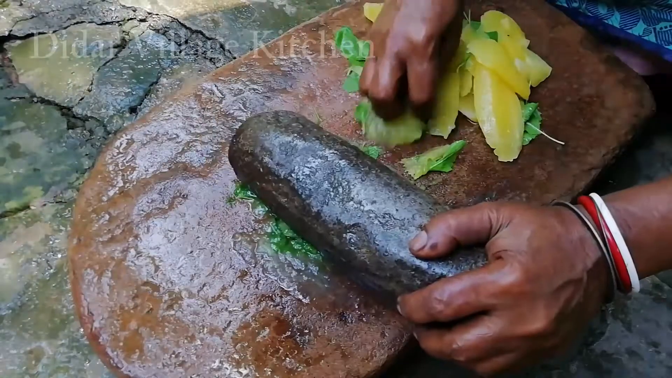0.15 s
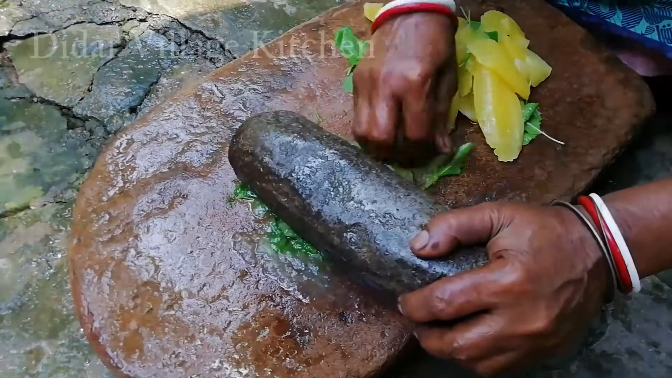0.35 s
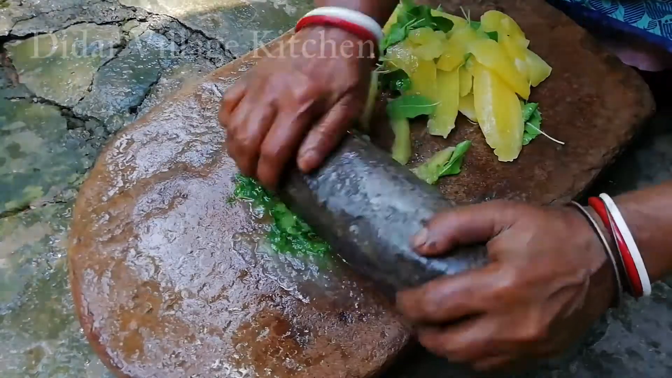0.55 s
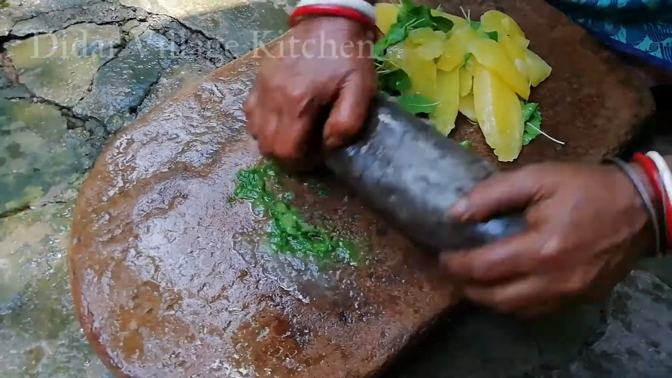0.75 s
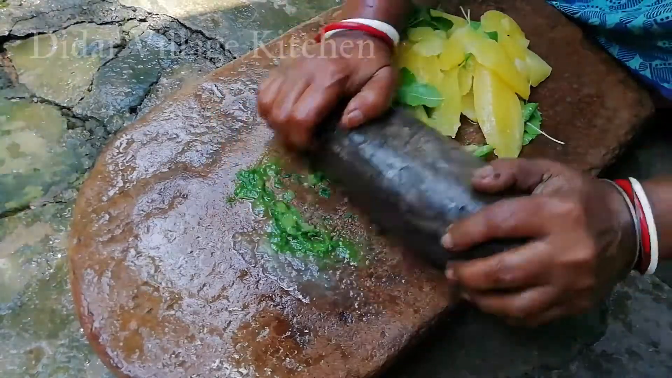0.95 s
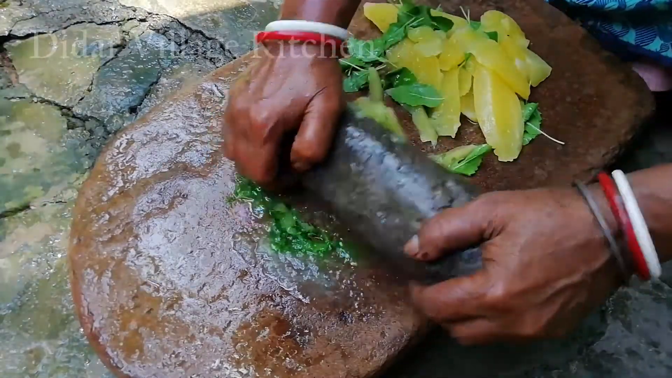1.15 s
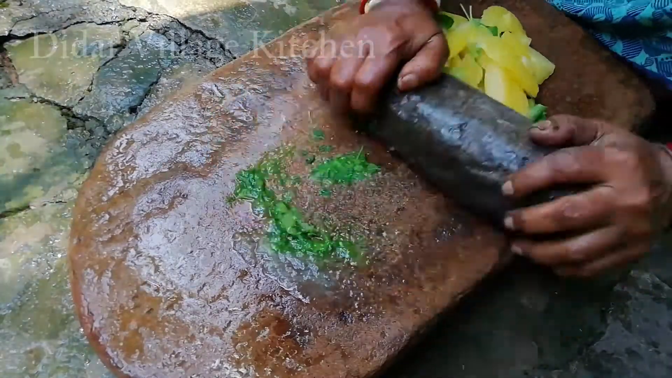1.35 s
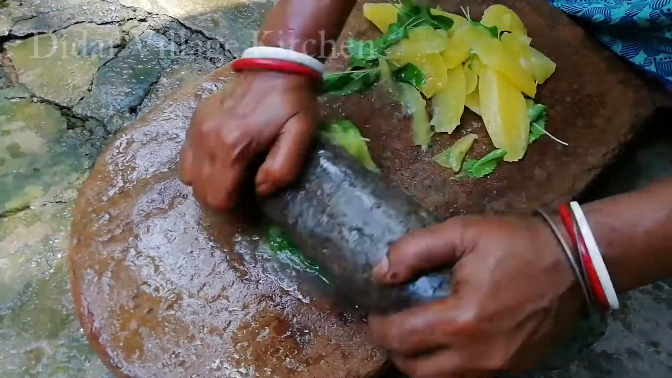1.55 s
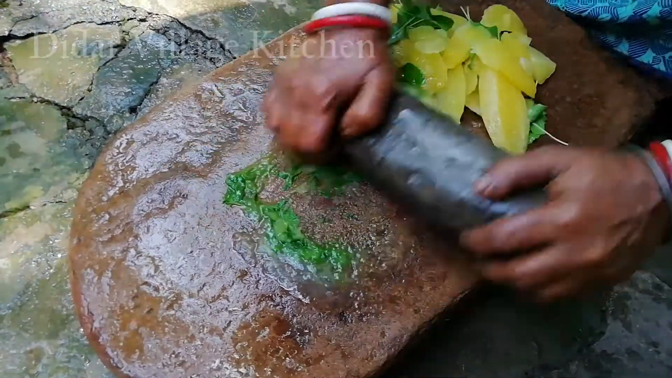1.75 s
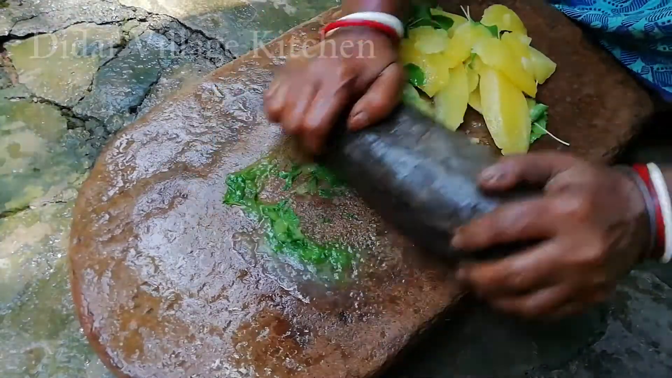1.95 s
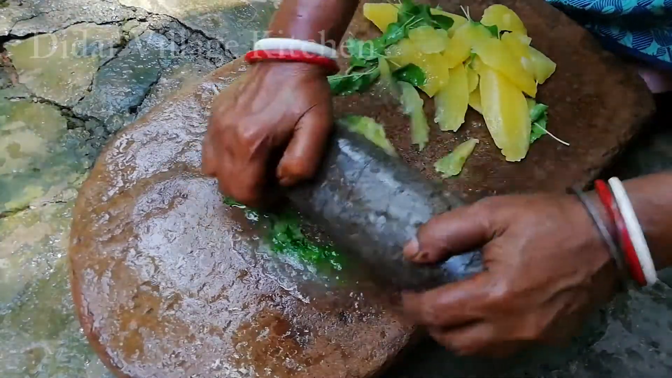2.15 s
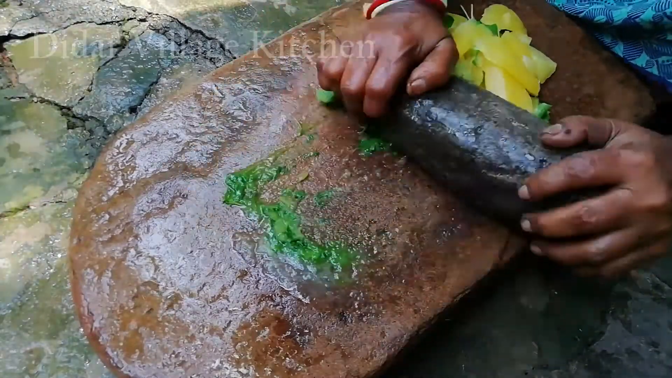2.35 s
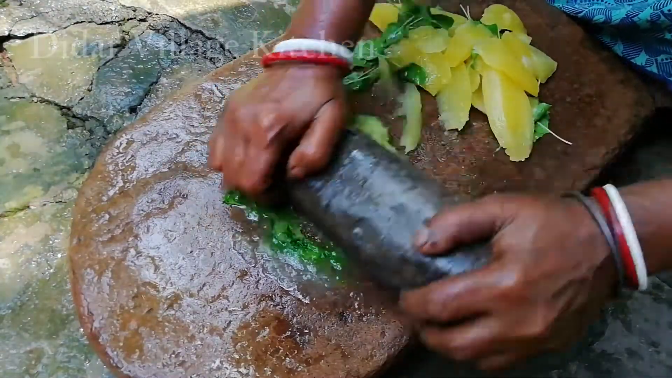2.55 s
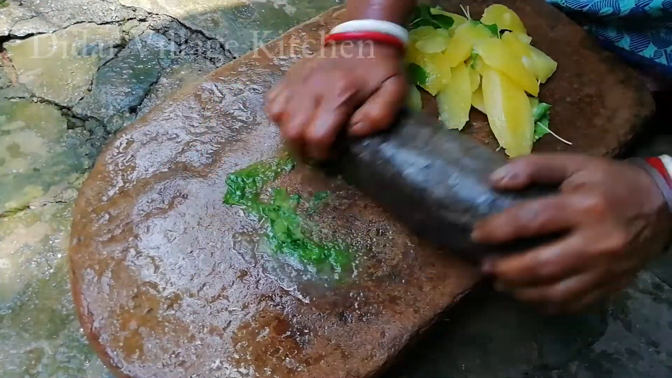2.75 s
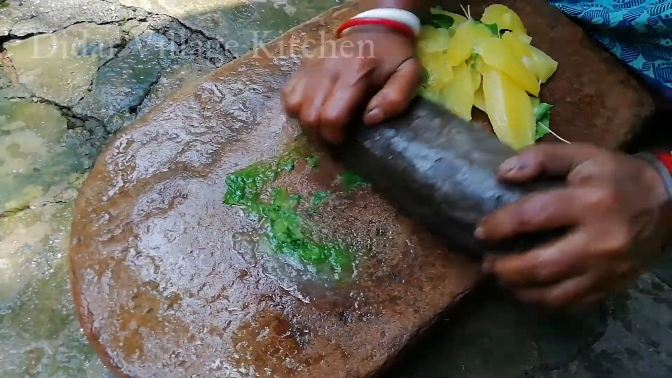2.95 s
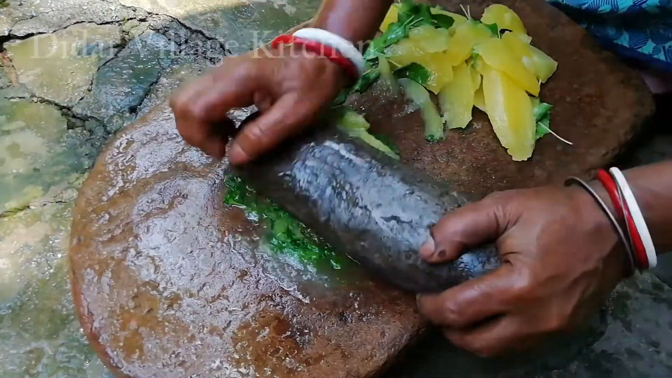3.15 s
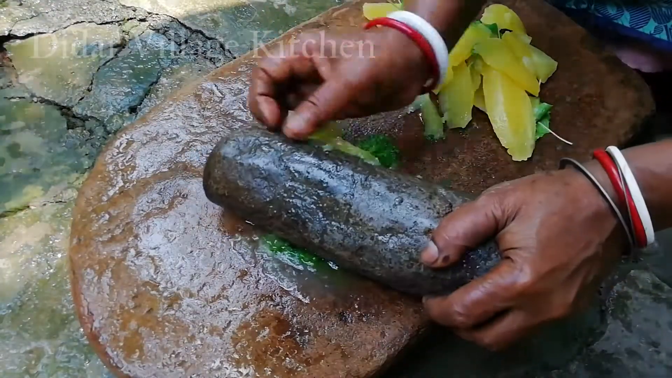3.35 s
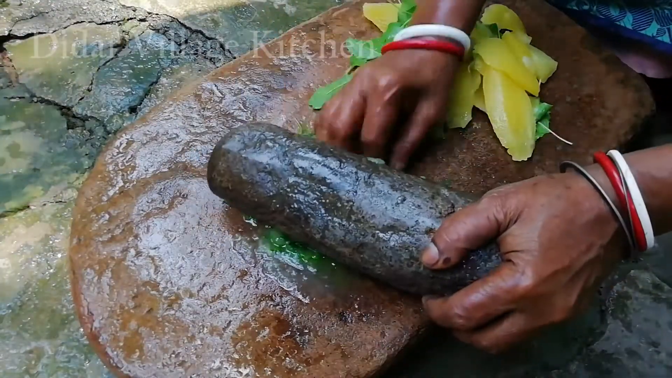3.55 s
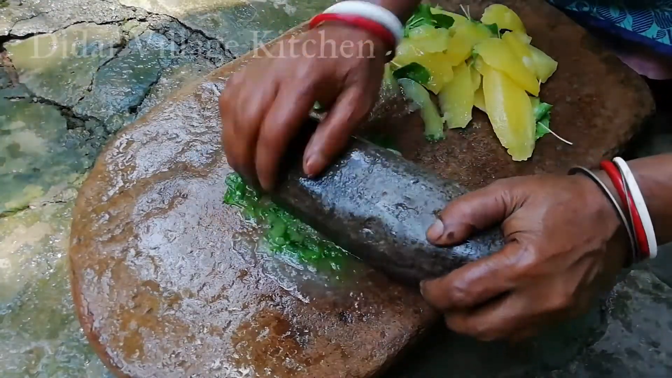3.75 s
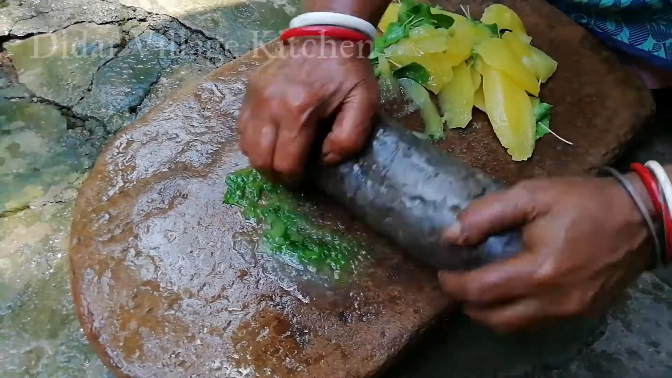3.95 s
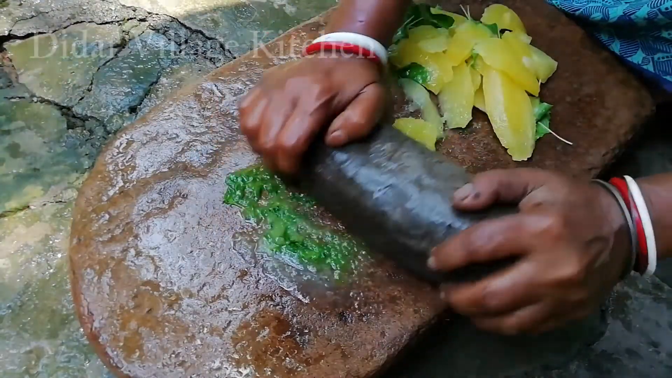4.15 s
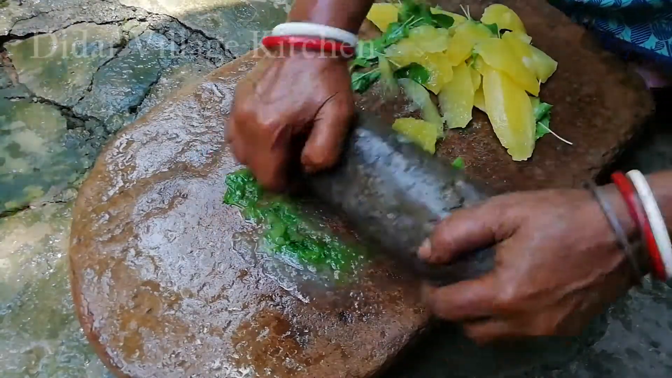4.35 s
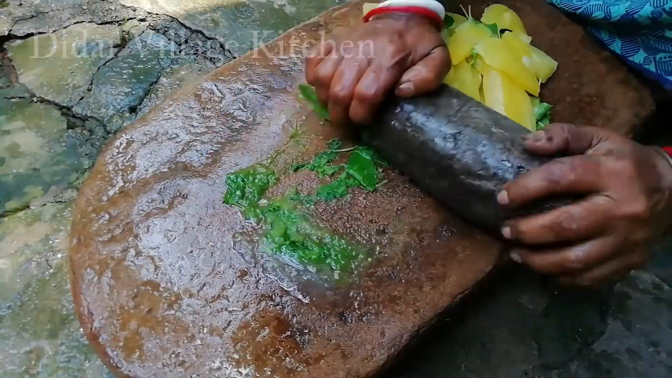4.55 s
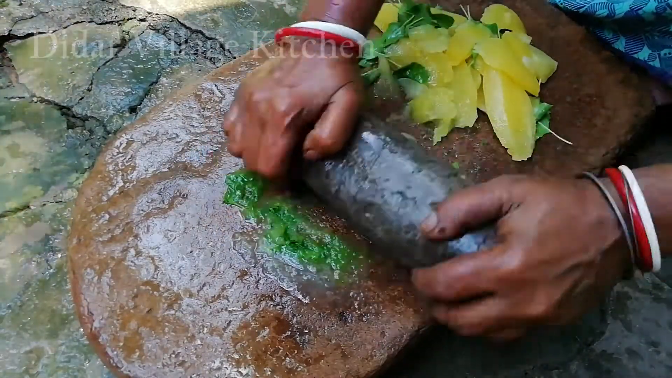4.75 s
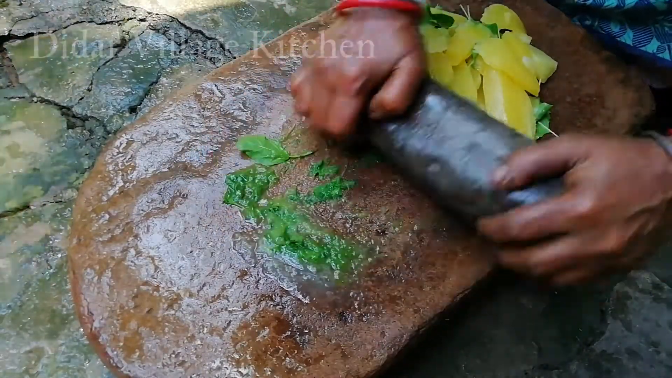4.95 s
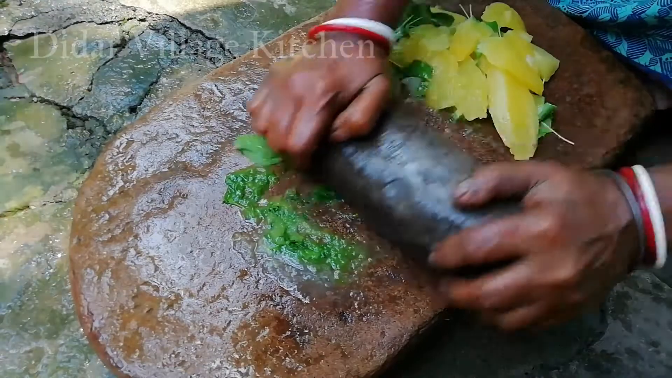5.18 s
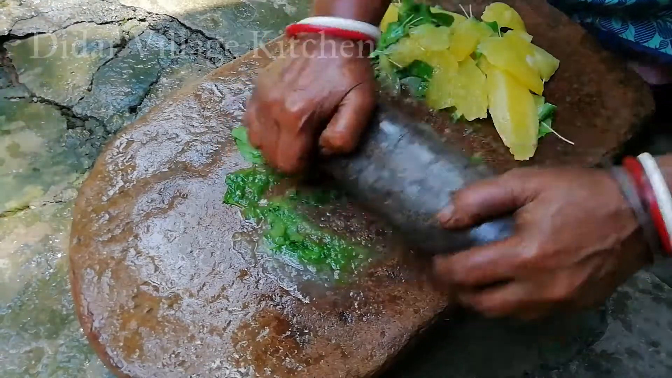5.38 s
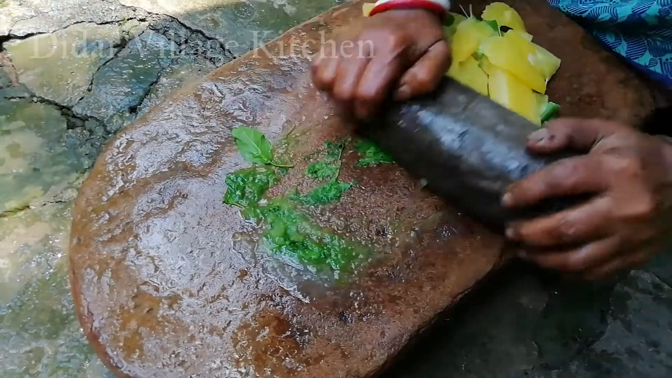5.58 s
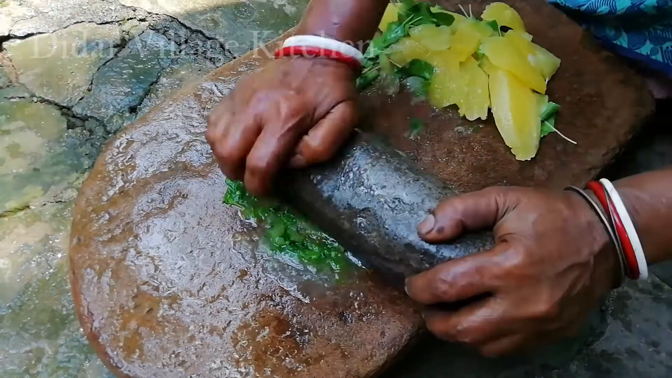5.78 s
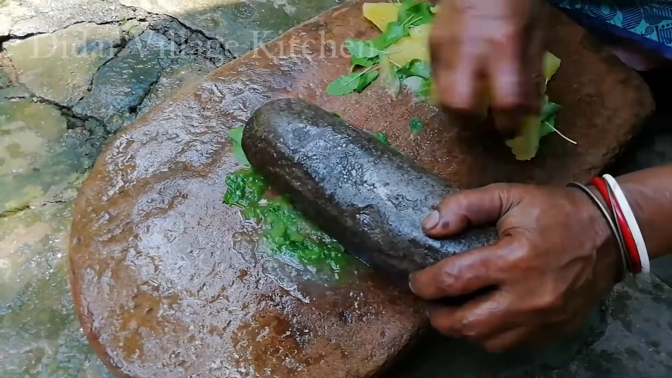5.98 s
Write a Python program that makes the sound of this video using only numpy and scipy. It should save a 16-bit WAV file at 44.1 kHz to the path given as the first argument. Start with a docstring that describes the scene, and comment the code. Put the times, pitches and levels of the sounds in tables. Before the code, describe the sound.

Close, gritty strokes of stone grinding wet leaves on stone, with small bumps, clinking bangles and faint insects behind.

```python
"""Grinding on a wet stone slab

A stone roller is pushed to and fro in a courtyard. Grit and pits excite the slab's resonant modes,
while the paste hisses and pulp bursts. Fruit drops with a thud, bangles clink, the roller knocks hard
once and water splashes nearby. Behind lie insects, a far engine, a rumble and puffs of air."""
import sys
import numpy as np
from scipy import signal
from scipy.fft import rfft, irfft, next_fast_len
from scipy.io import wavfile
from scipy.ndimage import uniform_filter1d, map_coordinates

SR = 44100
rng = np.random.default_rng(int(sys.argv[2]) if len(sys.argv) > 2 else 0)


def transcribe(signal):
    """Save signal, clipped to [-1, 1], as a 16-bit WAV file at the path in sys.argv[1]."""
    frames = np.atleast_2d(signal).T
    limited = np.clip(frames, -1, 1)
    pcm = np.round(limited * 32767).astype(np.int16)
    wavfile.write(sys.argv[1], SR, pcm)


N = 265482
TIME = np.arange(N) / SR

# Contacts that excite the slab: start_s, end_s, ring_db, grit_db, timbre
# They are rubs of the roller, except at 4.043 s: the slab's brief ring and gritty scrape
# at the hard knock, which only shares the "pull" timbre.
CONTACTS = [(0.588, 0.746, -24, -40, "push"), (0.829, 0.896, -25, -45.5, "push"),
            (0.952, 1.081, -33, -38, "pull"), (1.19, 1.336, -21, -34, "push"),
            (1.45, 1.573, -21.5, -33.5, "pull"), (1.686, 1.821, -18.5, -30.5, "push"),
            (1.949, 2.08, -24, -35, "pull"), (2.217, 2.348, -16, -31, "push"),
            (2.454, 2.59, -21, -32, "pull"), (2.726, 2.823, -21.5, -33.5, "push"),
            (2.81, 2.89, -35, -40, "pull"), (2.954, 3.085, -22.5, -34, "pull"),
            (3.124, 3.233, -45.5, -56, "push"), (3.84, 3.94, -29.5, -40, "push"),
            (4.043, 4.075, -30, -38.5, "pull"), (4.136, 4.232, -30.5, -38.5, "pull"),
            (4.339, 4.497, -21.5, -35, "push"), (4.603, 4.73, -28, -36.5, "pull"),
            (4.857, 5.001, -20, -34, "push"), (5.122, 5.257, -25.5, -34, "pull"),
            (5.374, 5.516, -17.5, -31, "push"), (5.61, 5.755, -24.5, -34, "pull")]
# Resonances of the slab: pitch_hz, bandwidth_hz, level_db
SLAB_MODES = [(180.4, 113, -24), (504.9, 16.7, 1.5), (819, 76, -11.5), (873, 220, -18.5), (1228, 87, -18),
              (1570, 200, -22.5), (1810, 153, -18), (2720, 133, -32.5), (3190, 300, -30), (3680, 240, -31),
              (4125, 77, -24)]
# Left-right likeness of near and of far sounds: frequency_hz, coherence
NEAR_COHERENCE = [(150, 0.95), (600, 0.96), (1000, 0.82), (1800, 0.3), (3000, 0.35), (15000, 0)]
FAR_COHERENCE = [(60, 1), (130, 0.89), (290, 0.57), (640, 0.4), (1400, 0), (15000, 0)]


def grinding():
    """Friction noise: grit under the roller drives the slab's modes, finer grit the higher ones."""
    hum, ring, coarse, rasp, scrape, wet = contact_gains()
    grit = grains(9000, scatter_db=1.0) * amp(1.38 * wobble(35))
    lumpy = coarse * amp(2.3 * wobble(70))
    # modes, gain, highpass_hz, lowpass_hz, roam_db
    groups = [(SLAB_MODES[:1], hum, 60, 700, 1.5), (SLAB_MODES[1:2], ring, 350, 600, .6),
              (SLAB_MODES[2:4], lumpy, 400, 1500, 1.5), (SLAB_MODES[4:7], rasp, 700, 3000, 1.5),
              (SLAB_MODES[7:], scrape, 1500, 8000, 2.5)]
    out = 0
    for modes, gain, highpass_hz, lowpass_hz, roam_db in groups:
        # The paste rounds each contact.
        force = filtered(grit, lambda f: (1j * f / (highpass_hz + 1j * f) / (1 + 1j * f / lowpass_hz))**2)
        drive = force * gain / np.std(slab(force, modes))
        for mode in modes:  # coupling varies as the contact point travels
            out += slab(drive * amp(roam_db * wobble(9)), [mode])
    return damping() * spread(out, NEAR_COHERENCE) + paste_fizz(wet)


def contact_gains():
    """Friction follows load: gains of hum, ring, coarse grit, rasp, scrape and fizz at each contact."""
    # Timbre and load: hum_db, rasp_db, scrape_db, fizz_db, end_ease_db, growth_db
    timbres = {"push": (-12, -9.5, -10.5, -25, 3.5, 0), "pull": (-4, -4.5, -6, -13, 5, 1.5)}
    lift_db_per_s, grit_share = 549, 0.26
    gains = np.zeros((6, N))
    for start, end, ring_db, grit_db, timbre in CONTACTS:
        hum_db, rasp_db, scrape_db, fizz_db, ease_db, growth_db = timbres[timbre]
        outside_s = np.maximum(np.maximum(start - TIME, TIME - end), 0)
        place = np.clip(2 * (TIME - start) / (end - start) - 1, -1, 1)
        load_db = growth_db * place - ease_db * place ** 2
        coarse_db = grit_db + grit_share * load_db
        levels_db = np.array([coarse_db + hum_db, ring_db + load_db, coarse_db, coarse_db + rasp_db,
                              coarse_db + scrape_db, np.full(N, grit_db + fizz_db)])
        gains += amp(levels_db - lift_db_per_s * outside_s)
    return gains


def slab(force, modes):
    """Modal superposition: resonances sum, leaving notches; so small a stone radiates no deep bass."""
    def ring(f):
        return sum(amp(db) * 1j * f * width / (hz**2 - f**2 + 1j * f * width) for hz, width, db in modes)
    return filtered(force, lambda f: ring(f) * (1j * f / (110 + 1j * f)) ** 3)


def damping():
    """Contact damping: a gain that falls as the resting roller's weight chokes the ring."""
    settle_s, choke_db_per_s = .04, 350
    resting_s = np.min([np.where(TIME > start - settle_s, TIME - end, 9)
                        for start, end, *_ in CONTACTS], axis=0)
    choke_db = choke_db_per_s * np.clip(resting_s - settle_s, 0, .035)
    return uniform_filter1d(amp(-choke_db), size=SR // 60)


def bumps():
    """Impulse response: each drop into a pit rings the slab with a short, rounded push."""
    # Drops of the roller: start_s, level_db
    pits = [(0.575, -27.5), (0.658, -22.5), (1.306, -21.5), (1.36, -25), (1.456, -16.5), (1.481, -19.5),
            (1.688, -17.5), (1.75, -21), (1.805, -17), (2.22, -22), (2.272, -16), (2.308, -17.5),
            (2.5, -16), (2.713, -26), (2.77, -18), (2.847, -25), (3.009, -19), (4.342, -23), (4.411, -21.5),
            (4.891, -17), (5.197, -23), (5.37, -23), (5.455, -15.5), (5.65, -15), (5.738, -24)]
    rise_s = .00034
    impulses = np.zeros((2, N))
    for (start, db), side in zip(pits, rng.normal(0, 0.89, len(pits))):
        impulses[:, round(start * SR)] = amp(db) * np.array([1, side])
    ring = slab(TIME * np.exp(-TIME / rise_s), SLAB_MODES)[:SR // 2]
    drops = signal.fftconvolve(impulses, ring[None] / np.abs(ring).max(), axes=1)[:, :N]
    return damping() * spread(drops, NEAR_COHERENCE)


def knock():
    """Free vibration: one hard blow on bare stone leaves quickly decaying sinusoids."""
    # Modes of the clack: pitch_hz, level_db, t60_s, pan_db
    modes = [(1224, -0.5, 0.0062, 3), (506, -16.5, 0.078, 2), (926, -7, 0.008, 9),
             (1870, -15.5, 0.024, 8.5), (2540, -27, 0.024, 0)]
    start_s, rise_s = 4.049, .00041
    out, t = np.zeros((2, N)), np.arange(SR // 20) / SR
    ring = sum(amp(db - 60 * t / t60) * pan(pan_db) * np.sin(2 * np.pi * hz * t)
               for hz, db, t60, pan_db in modes)
    out[:, round(start_s * SR):][:, :len(t)] = -2 * ring * (1 - np.exp(-t / rise_s))
    return out


def paste_fizz(gain):
    """Shot noise: dense crackles in the wet paste merge into a hiss."""
    # Hiss spectrum: frequency_hz, density_db
    spectrum = [(3000, -29), (5000, 1), (6500, 2), (9000, -6.5), (12000, -14), (16000, -18)]
    crackle = grains(7000, scatter_db=2.2)
    flicker = amp(4.1 * wobble(40))
    return gain * flicker * rush(spectrum, NEAR_COHERENCE, patchy_db=1.2, source=crackle) * pan(3.2)


def pulp():
    """Band-limited shot noise: pulp bursts under the stone in short runs of pops."""
    # Bursts: start_s, length_s, level_db, centre_hz
    bursts = [(0.113, .01, -35, 2500), (1.32, 0.072, -31, 4750), (1.833, 0.12, -34, 5100),
              (2.326, 0.029, -24.5, 4800), (2.356, 0.058, -30.5, 4700), (2.361, 0.038, -39, 9500),
              (2.457, 0.041, -28, 5900), (2.623, 0.033, -35, 4700), (2.902, 0.053, -31, 4700),
              (4.042, 0.046, -29.5, 5440), (4.542, 0.0089, -29.5, 1501), (5.278, 0.027, -25, 2320)]
    out = 0
    for start, length, db, hz in bursts:
        age = (TIME - start) / length
        envelope = ((age > 0) & (age < 1)) * (1 - 0.78 * age)
        pops = amp(db) * envelope * grains(8000, scatter_db=1.4)
        out += filtered(pops, lambda f: (0.72j * f * hz / (hz**2 - f**2 + 0.46j * f * hz)) ** 2)
    return out


def bangles():
    """Impact excitation: each touch gives a sharp tick and a brief inharmonic ring."""
    # Touches: start_s, level_db, treble_db, pan_db
    touches = [(0.8555, -28, -9, 0), (0.9064, -19.5, -10.5, 3), (1.324, -32, -15, 5), (1.3956, -31, -10, 3),
               (1.4431, -35, -10, -2.5), (1.8737, -19.5, -3.5, 0.5), (2.026, -33, -13, -12),
               (2.0786, -35.5, 6, -5), (2.22, -39, 2, -7), (2.2902, -35, -9, -4), (2.33, -22, -11, -2),
               (2.4483, -30, -12, 4), (2.4683, -28, -13, -9), (2.7142, -35, -10, -12.5),
               (2.779, -22, -11, -3), (2.795, -40, -1, -1), (2.9063, -35, -5, 5.5), (2.9427, -34, -6, 3.5),
               (3.0275, -27.5, -14, 0), (4.0243, -34, -6, -2), (4.048, -31, -4, -8.5),
               (4.112, -22.5, -7, 2), (4.2723, -34, -3, -0.5), (4.557, -18, -12, 3), (5.024, -25, -10, 10),
               (5.3203, -26, -8, 1.5), (5.534, -23, 2, -1.5), (5.7688, -35, -14, 5),
               (5.8666, -36, -10, 2.5)]
    # Bangle resonances: pitch_hz, level_db
    modes = [(2500, -18), (4500, -9), (6700, -1), (7200, 0.5), (11700, -4), (14200, -4)]
    shelf_hz, ring_t60_s, tick_t60_s, lead_samples = 10500, .02, .014, 64
    out, t = np.zeros((2, N + SR)), np.arange(SR // 8) / SR
    shelf = 1 / (1 + (shelf_hz / (np.fft.rfftfreq(len(t), 1 / SR) + 1)) ** 12)
    for start, db, treble_db, pan_db in touches:
        ring = 0
        for mode_hz, mode_db in modes:
            hz = mode_hz * rng.normal(1, 0.05)
            ring += amp(rng.normal(mode_db, 2.2)) * np.sin(2 * np.pi * (hz * t + rng.random((2, 1))))
        tick = np.diff(rng.standard_normal((2, len(t) + 1)))
        touch = 0.75 * ring * amp(-60 * t / ring_t60_s) + 0.9 * tick * amp(-60 * t / tick_t60_s)
        touch = np.roll(touch, lead_samples, axis=1)  # room for the shelf's pre-ringing
        touch = irfft(rfft(touch) * amp(treble_db * shelf), len(t))
        out[:, round(start * SR) - lead_samples:][:, :len(t)] += amp(db) * pan(pan_db) * touch
    return out[:, :N]


def fruit_thud():
    """Soft impact: fruit dropped on the slab gives a dull, quickly damped noise."""
    # The drop: start_s, level_db, t60_s
    drop = (.291, -27, 0.32)
    # Thud spectrum: frequency_hz, density_db
    spectrum = [(25, -5), (50, -1), (150, -1), (250, -9), (450, -3), (800, -19.5), (1400, -28.5),
                (1950, -18.5), (2400, -25), (4500, -42)]
    start, db, t60 = drop
    t = TIME - start
    envelope = amp(db - 60 * np.abs(t) / t60) * np.clip(t / 0.0031, 0, 1)
    return envelope * rush(spectrum, NEAR_COHERENCE, patchy_db=3)


def splash():
    """Shot noise of water: a faint hiss of tiny impacts surges once, close by."""
    # Water thrown and draining: time_s, level_db
    flow = [(5.0, -54), (5.025, -28.5), (5.1, -22), (5.19, -27.5), (5.22, -27), (5.29, -23.5),
            (5.36, -23.5), (5.41, -32), (5.46, -28.5), (5.62, -40), (6.02, -45)]
    # Splash spectrum: frequency_hz, density_db
    spectrum = [(1200, -15.5), (2000, -12), (3000, -9.5), (4300, -7), (6200, 2.5), (8000, -4.5),
                (10000, -10.5), (16000, -18.5)]
    db, = curves(flow)
    gain = amp(db + 1.2 * wobble(30))
    drops = grains(16000, scatter_db=1.1)
    return gain * rush(spectrum, NEAR_COHERENCE, patchy_db=2, source=drops) * pan(2.8)


def walls(x):
    """Reverberation: the courtyard's reflections decay faster at high frequencies."""
    # Decay times: frequency_hz, t60_s
    decay = [(200, 0.19), (2000, 0.16), (12000, 0.048)]
    hz, t, spectra = signal.stft(rng.standard_normal((2, SR // 2)), SR, nperseg=256)
    tail = signal.istft(spectra * amp(-60 * t / along(decay, hz)[:, None]), SR, nperseg=256)[1]
    delayed = np.pad(x, ((0, 0), (300, 0)))
    return signal.fftconvolve(delayed, tail / np.linalg.norm(tail[0]), axes=1)[:, :N]


def insects():
    """Amplitude modulation: insects are heard as a fluttering band of high noise."""
    # Chorus spectrum: frequency_hz, density_db
    spectrum = [(4300, -21), (4900, -4.5), (5400, -0.5), (6100, 1.5), (6800, -5.5), (7800, -18.5),
                (9500, -29)]
    gain = amp(-42.5 + 0.81 * wobble(60) + 0.44 * wobble(0.79))
    return gain * rush(spectrum, FAR_COHERENCE, patchy_db=0.75)


def engine():
    """Harmonic series: multiples of a far engine's firing rate waver on their way."""
    # Slow running: time_s, firing_hz, level_db
    running = [(0.0, 17.2, -44), (0.5, 19.2, -44.5), (0.87, 20.2, -42), (2.01, 15.9, -53),
               (2.67, 17.7, -52), (3.07, 16.1, -48), (3.57, 19.6, -46.5), (4.12, 16.8, -43),
               (4.79, 20.8, -47.5), (5.31, 21.6, -53), (6.02, 18, -48.5)]
    # Exhaust response: frequency_hz, gain_db
    exhaust = [(35, -36), (70, -11), (95, 3), (120, -14.5), (170, -5.5), (230, -21.5), (450, -37.5)]
    hz, db = curves(running)
    phase = 2 * np.pi * np.cumsum(hz) / SR
    out = 0
    for k in range(2, 24):
        gain = amp(db + along(exhaust, k * hz) + 3.35 * wobble(2.5))
        out += gain * np.cos(k * phase + 0.52 * wobble(3.05))
    return out


def yard():
    """Ambient noise: a far rumble swells and sinks over the steady hush of the air."""
    # Swell of the rumble: time_s, level_db
    swell = [(0, -39.5), (.9, -39.5), (2.2, -48), (4.2, -41), (5.1, -49), (5.35, -40.5), (6.02, -49.5)]
    # Spectra of rumble and air: frequency_hz, density_db
    rumble_spectrum = [(12, -47.5), (20, -12), (48, -27.5), (66, -6), (97, -3), (150, -13), (216, -22),
                       (353, -32), (400, -26.5), (520, -74), (880, -120)]
    air_spectrum = [(150, -44.5), (250, -11), (1100, -17), (1790, -20.5), (2860, -17.5), (3340, -16.5),
                    (6140, -19.5), (7190, -16.5), (16000, -34.5)]
    db, = curves(swell)
    rumble = amp(db) * rush(rumble_spectrum, FAR_COHERENCE, patchy_db=-0.5) * pan(1.4)
    return rumble + amp(-49.5) * rush(air_spectrum, FAR_COHERENCE, patchy_db=2)


def breeze():
    """Wind noise: puffs of air at the microphones make low, lumpy pressure fluctuations."""
    # Puffs: peak_s, level_db, ten_db_fall_s
    puffs = [(.3, -48, 0.07), (5.33, -39, 0.32), (5.92, -48.5, .15)]
    # Wind spectrum: frequency_hz, density_db
    spectrum = [(12, -40), (25, -16), (45, -7.5), (72, -5), (95, -10), (200, -38.5)]
    calm_db = -61.5
    gain = amp(calm_db) + sum(amp(db - 10 * np.abs(TIME - peak) / fall) for peak, db, fall in puffs)
    return gain * amp(1.7 * wobble(10)) * rush(spectrum, FAR_COHERENCE, patchy_db=3)


def amp(db):
    """Decibels to amplitude gain."""
    return 10 ** (np.asarray(db) / 20)


def pan(db):
    """Level difference: stereo gains with left db above right."""
    return amp([[db / 2], [-db / 2]])


def unit(x):
    """Normalisation to rms 1."""
    return x / np.sqrt(np.mean(x ** 2) + 1e-20)


def along(points, hz):
    """Interpolation of (frequency_hz, value) points on a log axis."""
    f, values = np.transpose(points)
    return np.interp(np.log(hz + 1), np.log(f + 1), values)


def curves(rows):
    """Interpolation to every sample of each column after the time."""
    times, *columns = np.transpose(rows)
    return [np.interp(TIME, times, column) for column in columns]


def wobble(rate):
    """Random modulation: a smooth curve with rate knots a second."""
    return map_coordinates(rng.standard_normal(int(N * rate / SR) + 4), [TIME * rate])


def filtered(x, response):
    """Linear filtering by a complex frequency response."""
    size = next_fast_len(N + SR // 2)
    return irfft(rfft(x, size) * response(np.fft.rfftfreq(size, 1 / SR)), size)[..., :N]


def spread(pair, coherence):
    """Mid-side mixing: two unrelated signals become left and right of the given coherence."""
    def weights(hz):
        angle = np.arccos(np.clip(along(coherence, hz), -1, 1)) / 2
        return np.array([np.cos(angle), np.sin(angle)])
    mid, side = filtered(pair, weights)
    return np.array([mid + side, mid - side])


def grains(per_second, scatter_db):
    """Poisson process: two trains of tiny, uneven impacts that share their times."""
    size = (rng.random(N) < per_second / SR) * amp(scatter_db * rng.exponential(size=N))
    return unit(size * rng.standard_normal((2, N)))


def rush(spectrum, coherence, patchy_db, source=None):
    """Spectral shaping: stereo noise of rms 1 with random patches of gain in time and frequency."""
    if source is None:
        source = rng.standard_normal((2, N))
    spectra = signal.stft(source, nperseg=512)[2]
    patches = uniform_filter1d(rng.standard_normal(spectra.shape[1:]), size=6, axis=0)
    patches = unit(uniform_filter1d(patches, size=8, axis=1))
    pair = signal.istft(spectra * amp(patchy_db * patches), nperseg=512)[1][:, :N]
    coloured = filtered(pair, lambda hz: amp(along(spectrum, hz)))
    return unit(spread(coloured, coherence))


def scene():
    """Superposition of the work on the slab, the echo of its sharp hits and the background."""
    hits = bumps() + knock() + bangles()
    work = grinding() + hits + amp(-18.5) * walls(hits) + fruit_thud() + splash() + pulp()
    return work + insects() + engine() + yard() + breeze()


def record(dry):
    """Soft saturation rounds the loudest peak; a band limit removes the highest treble."""
    ceiling, top_hz = .97, 16300
    rounded = dry / (1 + np.abs(dry / ceiling) ** 6) ** (1 / 6)
    return filtered(rounded, lambda hz: hz < top_hz)


dry = scene()
out = record(dry)
transcribe(out)
```